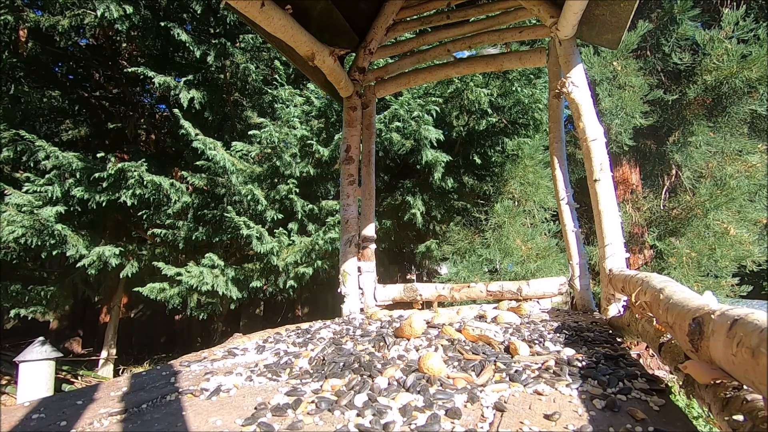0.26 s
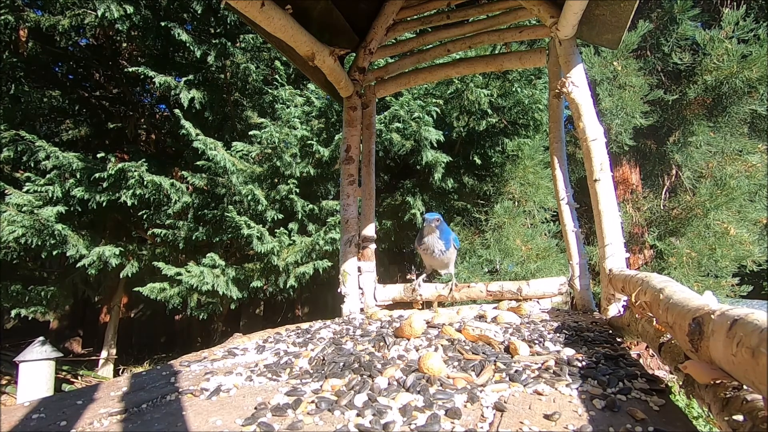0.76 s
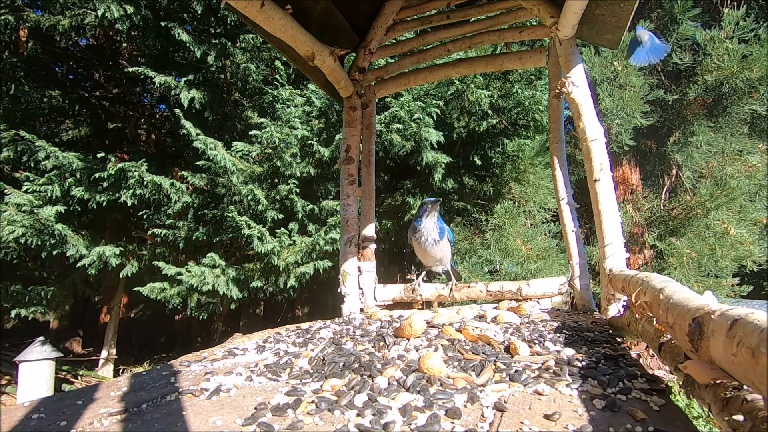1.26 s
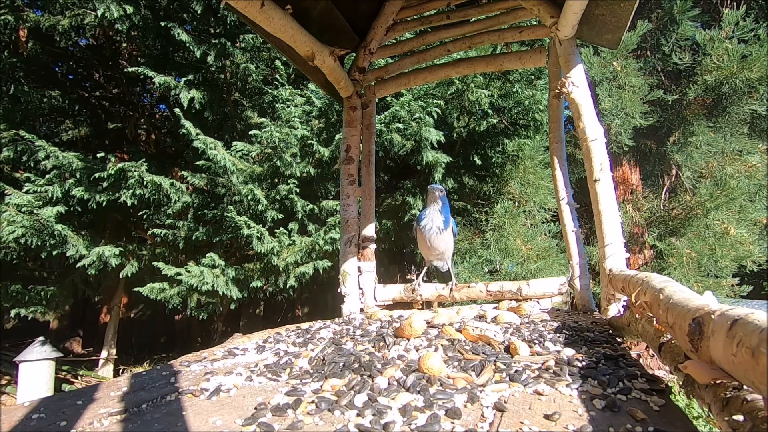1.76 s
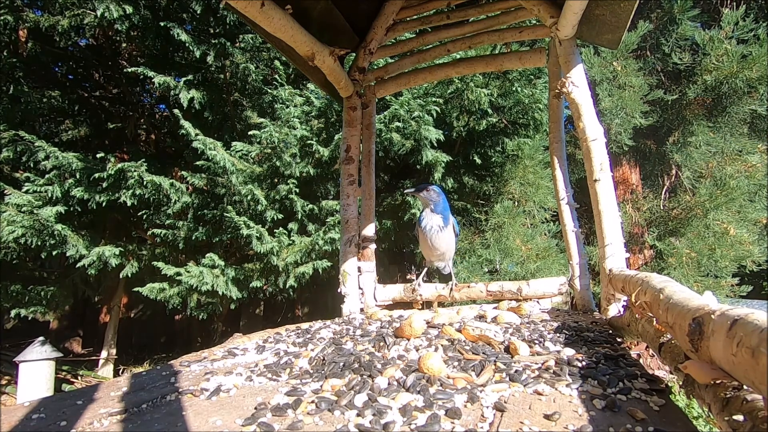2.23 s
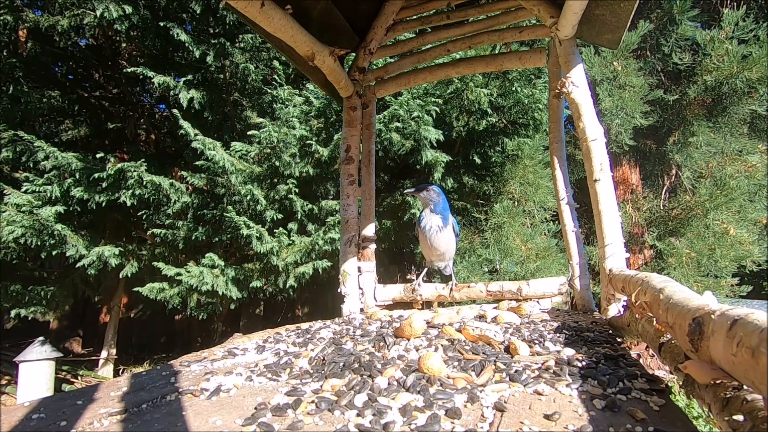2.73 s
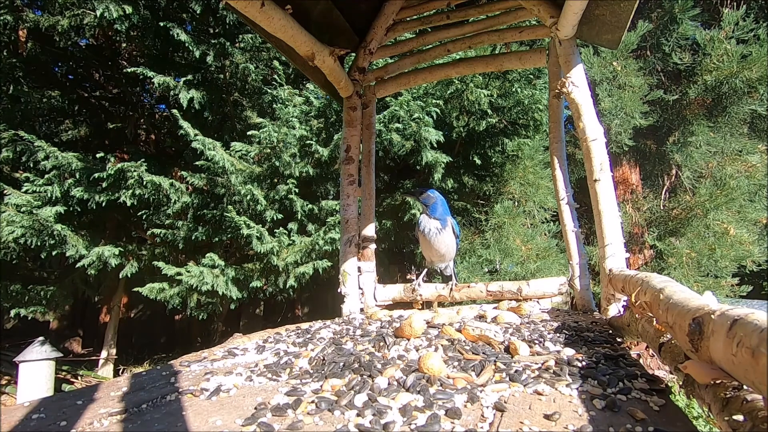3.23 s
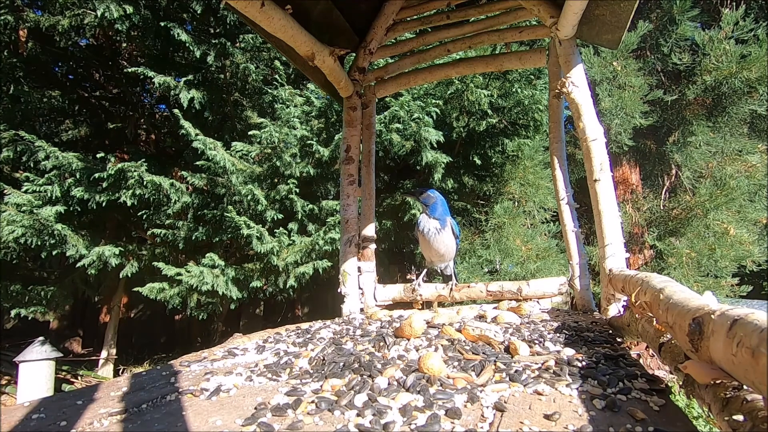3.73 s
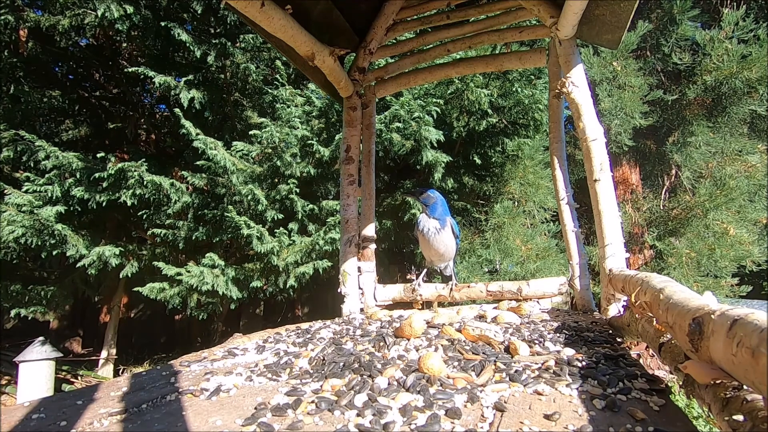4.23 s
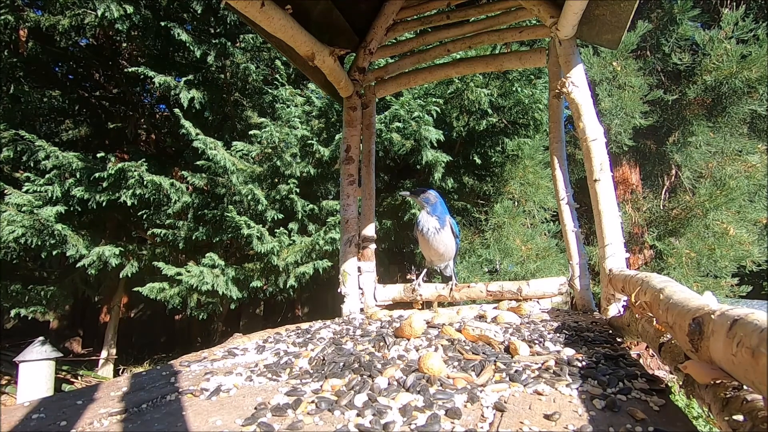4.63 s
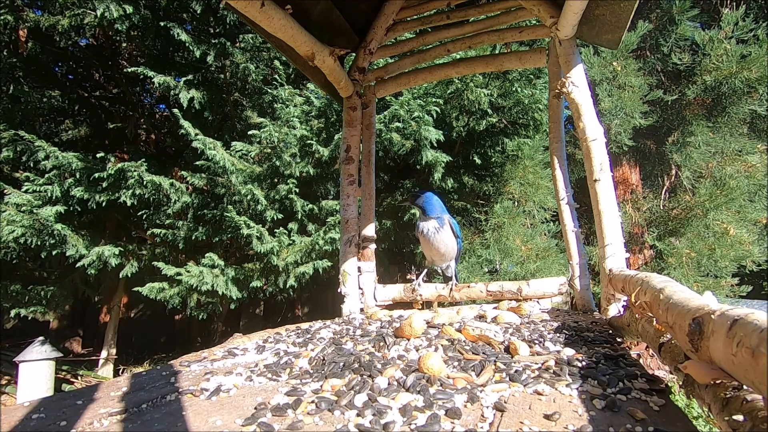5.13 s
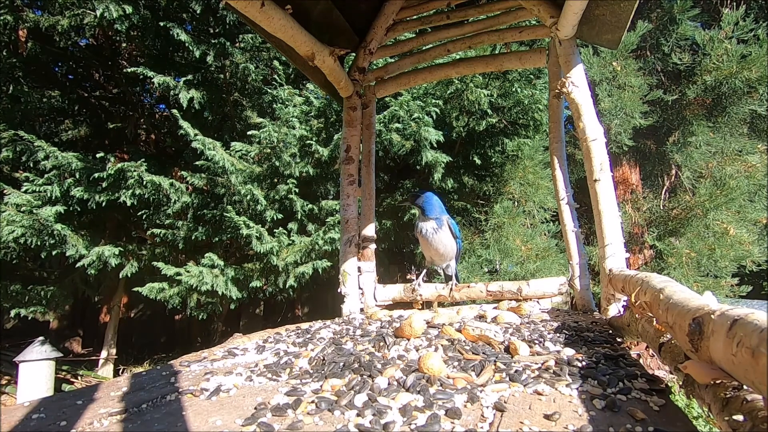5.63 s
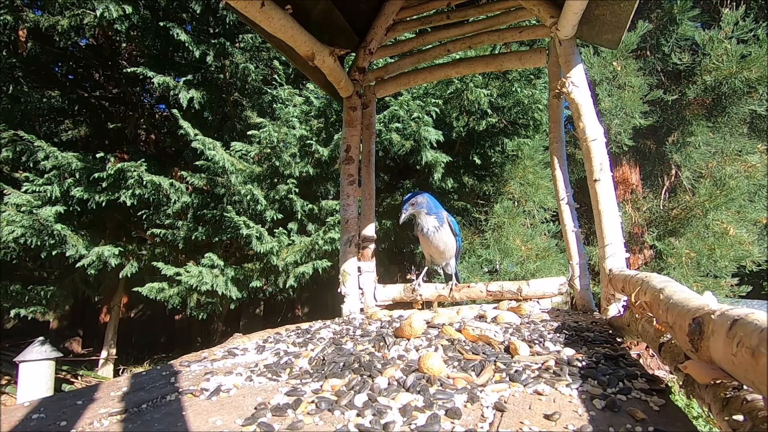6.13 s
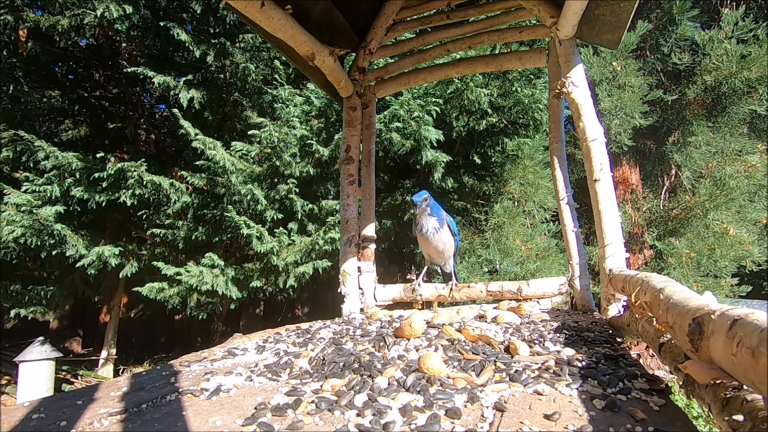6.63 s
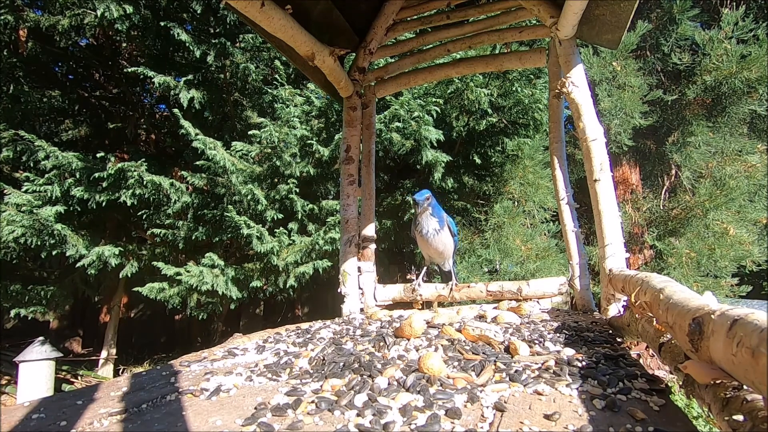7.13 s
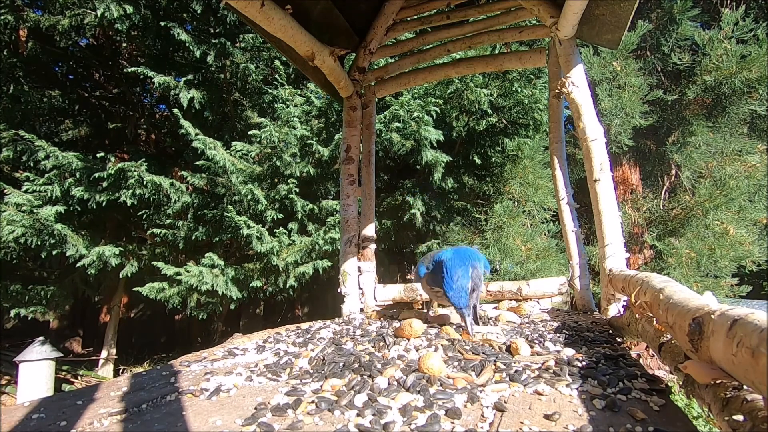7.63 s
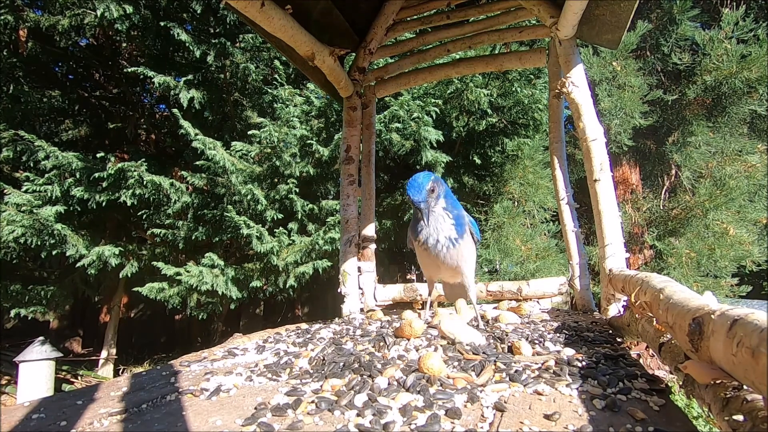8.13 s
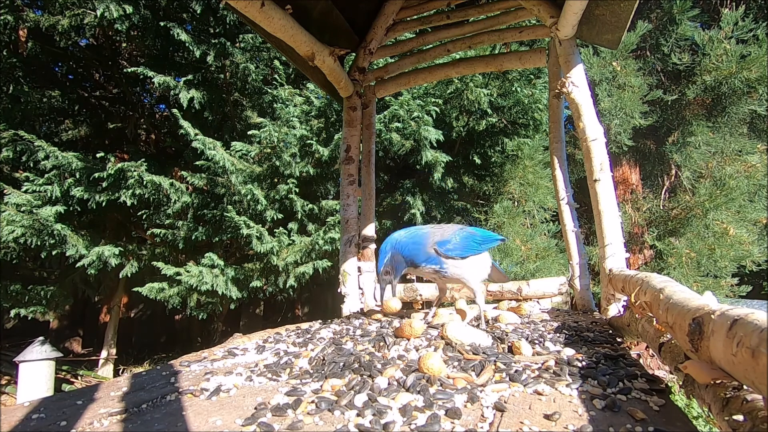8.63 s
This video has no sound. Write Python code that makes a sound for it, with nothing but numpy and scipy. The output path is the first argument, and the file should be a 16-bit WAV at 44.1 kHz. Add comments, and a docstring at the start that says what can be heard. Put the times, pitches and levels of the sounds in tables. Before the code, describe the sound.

Outdoors at a wooden bird feeder, microphone close on the seed tray. Faint wing flutter, a hollow thump of feet on the rail, then loud rasping jay shrieks overlapped by a second jay's short rising barks. After that it quiets to three soft rattling croaks and faint far jay calls over low traffic and a wavering machine hum. Finally claws scratch dry seed and a nut drops with a sharp click.

```python
"""A jay lands on a wooden feeder rail, two jays shriek and bark close by, then come three soft croaks,
scratching in the seed and a dropped nut; other jays answer far off over traffic and machine hum.
Calls: two coupled pitches and breath noise through throat and mouth; croaks: pulses and air ringing resonances.
Rail and nut shells: struck decaying modes; seed: random ticks; wings, traffic: shaped noise; hum: wavering sines.
Roof and yard add scattered echoes; the level ducks at the loudest sounds and recovers slowly."""
import sys
import numpy as np
from scipy import signal
from scipy.fft import rfft, irfft, next_fast_len
from scipy.io import wavfile
from scipy.ndimage import uniform_filter1d

SR = 44100
rng = np.random.default_rng(int(sys.argv[2]) if len(sys.argv) > 2 else 0)


def wrap_up_sound(samples):
    """Save the sound to the file named by the first command line argument, as 16-bit audio."""
    columns = np.atleast_2d(samples).T
    # keep every value between -1 and 1, then stretch to whole-number steps
    tamed = np.clip(columns, -1, 1)
    steps = np.round(tamed * 32767).astype(np.int16)
    wavfile.write(sys.argv[1], SR, steps)


N = 391608


def from_db(db):
    """Decibels to gain."""
    return 10 ** (np.asarray(db) / 20)


def rms_one(x):
    """Scale to rms 1."""
    return x / np.sqrt(np.mean(x ** 2) + 1e-20)


def at_hz(points, hz):
    """Read a spectrum on a log-frequency axis."""
    point_hz, value = np.array(points)[:, 0], np.array(points)[:, 1]
    return np.interp(np.log(hz), np.log(point_hz), value)


def colour(x, spectrum):
    """Weight every frequency by a spectrum in dB."""
    size = next_fast_len(x.shape[-1] + 512)
    hz = np.maximum(np.fft.rfftfreq(size, 1 / SR), 1)
    return irfft(rfft(x, size) * from_db(at_hz(spectrum, hz)), size)[..., :x.shape[-1]]


def drift(rate_hz, size):
    """Random wander of rms 1: noise through two equal one-pole low-passes."""
    r = np.exp(-2 * np.pi * rate_hz / SR)
    noise = rng.standard_normal(size + 1500)
    return rms_one(signal.lfilter([1], [1, -2 * r, r * r], noise)[1500:])      # skip the onset


def ring(drive, hz, t60_s):
    """Two-pole resonance: a unit click starts a decaying sine of height 1."""
    r, w = from_db(-60 / (t60_s * SR)), 2 * np.pi * hz / SR
    return signal.lfilter([0, np.sin(w)], [1, -2 * r * np.cos(w), r * r], drive + 1e-18)


def pan(x, db):
    """Mono to a pair, db = left over right."""
    return np.array([x * from_db(db / 2), x * from_db(-db / 2)])


def swells(rows, attack=1):
    """Sum of bell-shaped gains; attack scales the spread before each centre."""
    t = np.arange(N) / SR
    gain = 0
    for centre_s, spread_s, db in rows:
        side_s = spread_s * np.where(t < centre_s, attack, 1)
        gain = gain + from_db(db) * np.exp(-((t - centre_s) / side_s) ** 2)
    return gain


def arch(share, peak, rise_db, rise_power, fall_db, fall_power):
    """Level in dB that climbs to 0 at the peak and falls away."""
    before = np.clip(1 - share / peak, 0, 1)
    after = np.clip((share - peak) / (1 - peak), 0, 1)
    return -rise_db * before ** rise_power - fall_db * after ** fall_power


def echoes(x, t60_s, gap_s):
    """Dense decaying noise echoes after a gap, independent per channel."""
    t = np.arange(round(t60_s * SR)) / SR
    tail = rng.standard_normal((2, len(t))) * from_db(-60 * t / t60_s) * (t > gap_s)
    tail /= np.sqrt(np.sum(tail ** 2, axis=1, keepdims=True))
    return signal.fftconvolve(x, tail, axes=1)[:, :N]


def roof(x):
    """Posts and roof a few hand-widths away scatter mostly treble, differently on each use."""
    roof_db, t60_s = -7, 0.008
    scattered = echoes(x, t60_s, 0.0002)[:, :x.shape[1]]
    return x + from_db(roof_db) * colour(scattered, [(500, 3.5), (3000, -0.5), (8000, 10)])


def traffic():
    """Far traffic: shaped noise whose channels part towards the treble."""
    # Spectrum: f/Hz, relative level/(dB per Hz)
    traffic_spectrum = [(13, -32.5), (25, -13), (55, -2.5), (100, -5.5), (160, -11.5), (250, -7),
                        (340, -10), (460, -18.5), (975, -14), (1500, -24), (2170, -38), (4000, -51.5),
                        (8950, -53.5), (13000, -81)]
    # Left-right correlation: f/Hz, likeness/1
    likeness = [(25, 1), (110, 0.95), (380, 0.95), (700, 1), (1300, 0.22), (2400, 0.092), (10000, 0.11)]
    level_db = -44.5
    size = next_fast_len(N)
    hz = np.maximum(np.fft.rfftfreq(size, 1 / SR), 1)
    alike = np.clip(at_hz(likeness, hz), 0, 1)
    mid, side = rfft(rng.standard_normal((2, size))) * from_db(at_hz(traffic_spectrum, hz))
    pair = np.sqrt(1 + alike) * mid + np.sqrt(1 - alike) * side * [[1], [-1]]
    noise = irfft(pair, size)[:, :N]
    return from_db(level_db + drift(1.5, N)) * rms_one(noise)


def hum():
    """Machine hum: sines wavering in pitch and level, the highest also swelling and sinking."""
    # Steady lines: f/Hz, waver/dB, level/dB
    steady_lines = [(120.4, 2.5, -48), (236.7, -1, -55)]
    # Swell of the higher line: t/s, level/dB
    drone_swell = [(0.0, -48), (0.84, -50.5), (0.96, -48.5), (2.25, -46.5), (6.23, -58), (6.35, -49),
                   (7.52, -56.5), (8.88, -53)]
    drone_hz, drone_waver_db = 315.7, 1
    drone_db = np.interp(np.arange(N) / SR, *np.transpose(drone_swell))
    out = np.zeros(N)
    for line_hz, waver_db, db in steady_lines + [(drone_hz, drone_waver_db, drone_db)]:
        gain = from_db(db + waver_db * drift(2.1, N)) * np.sqrt(2)
        hz = line_hz * (1 + 0.00782 * drift(4, N))
        out += gain * np.sin(2 * np.pi * np.cumsum(hz) / SR)
    return out


def background():
    """Traffic and hum, slightly right of centre."""
    return (traffic() + hum()) * from_db([[-0.35], [0.35]])


def wings():
    """Feather hiss and rustles as shaped noise, wing wind as 20-45 Hz noise."""
    # Wing beats and faint bright rustles: t/s, spread/s, level/dB
    rustles = [(.22, 0.017, -57), (.47, 0.026, -61.5), (.6, 0.083, -55.5), (.8, 0.068, -62),
               (3.17, 0.039, -65), (3.52, 0.026, -66), (4.54, 0.026, -57.5), (7.79, .08, -58.5)]
    # Hiss spectrum: f/Hz, relative level/(dB per Hz)
    wing_air = [(1500, 7), (2500, 2.5), (5000, -1.5), (9000, 1), (11000, -17)]
    # Low wing-wind gusts: t/s, spread/s, level/dB
    gusts = [(.72, 0.054, -39.5), (.985, 0.033, -25.5)]
    hiss = rms_one(colour(rng.standard_normal((2, N)), wing_air))
    noise = rng.standard_normal(N) + 0.4 * rng.standard_normal((2, N))      # partly shared by both channels
    wind = signal.sosfilt(signal.butter(2, [20, 45], "band", fs=SR, output="sos"), noise)
    return swells(rustles) * hiss + swells(gusts) * rms_one(wind) * from_db([[-1.5], [1.5]])


def struck(blows, modes, spread_db):
    """Blows excite decaying modes, each with its own random strength."""
    s, blow_db, pan_db = np.transpose(blows)
    at = np.round(s * SR).astype(int)
    chance = rng.standard_normal((len(at), len(modes)))
    out = 0
    for k, (hz, db, t60_s) in enumerate(modes):
        clicks = np.zeros((2, N))
        clicks[:, at] = pan(from_db(blow_db + db + spread_db * chance[:, k]), pan_db)
        out = out + ring(clicks, hz, t60_s) * (-1) ** k
    # the contact is not perfectly hard
    return signal.sosfilt(signal.butter(1, 10000, fs=SR, output="sos"), out)


def landing():
    """Feet strike the low modes of the wooden rail."""
    # Footfalls: t/s, blow level/dB, left-right/dB
    footfalls = [(.664, -19.5, -7), (.674, -16, -4.5), (.70, -29, -12.5)]
    # Rail modes: f/Hz, relative level/dB, t60/s
    rail_modes = [(149, -10.5, 0.25), (211, -7.5, 0.21), (246, -13.5, .25), (320, -9, 0.059),
                  (448, -13.5, .08), (655, -13.5, 0.031)]
    return struck(footfalls, rail_modes, spread_db=2.7)


def seed():
    """Scratching claws and shifting seed: dense uneven random ticks shaped by dry husks."""
    # Scratches and shifting seed: t/s, spread/s, level/dB
    scratches = [(.666, 0.007, -41.5), (7.61, 0.04, -37), (7.655, 0.012, -53), (7.686, 0.027, -43.5),
                 (7.821, 0.0084, -53), (8.07, 0.015, -61.5), (8.118, 0.033, -56.5), (8.183, 0.023, -49),
                 (8.238, 0.023, -60), (8.63, 0.034, -56)]
    # Husk spectrum: f/Hz, relative level/dB
    husks = [(1200, -8), (2200, 6.5), (3200, 3.5), (5000, -6.5), (7000, -7), (9500, -7.5), (12000, -23.5),
             (15500, -25)]
    attack = 0.46      # rise time over decay time
    ticks_per_s = 700
    size = (3, N)
    present = rng.random(size) < ticks_per_s / SR
    height = from_db(2.1 * np.minimum(rng.exponential(1, size), 4))
    ticks = present * height * rng.choice([-1, 1], size)
    mid, left, right = rms_one(colour(ticks, husks))
    return swells(scratches, attack) * (mid + 0.71 * np.array([left, right]))


def partials(phase, pitch_hz, count, level_db, hoarse):
    """Harmonics that fade upwards in soft passages and break up singly with hoarseness."""
    odd_db, breakup_db = -5, 8      # odd partials are weaker; breakup when fully hoarse
    out = 0
    for k in range(1, count):
        breakup = breakup_db * np.sqrt(hoarse) * drift(38, len(phase))
        gain = from_db(0.21 * k * level_db + odd_db * (k % 2) + breakup)
        out = out + np.cos(k * phase + k * k) * (k * pitch_hz < 15000) * gain
    return out


def voice(hoarse, level_db, mouth_hz, first_hz, second_hz, joined, throat):
    """Two unsteady coupled syrinx sides plus breath, through throat and moving mouth; level evened."""
    second_db, coupling_db = -2, 1      # second side alone; sum and difference tones
    flutter_db = 3      # whole voice, when fully hoarse
    size, hoarse = len(hoarse), np.clip(hoarse, 0, 1)

    def unsteady_phase(hz):
        return 2 * np.pi * np.cumsum(hz * (1 + 0.07 * hoarse * drift(70, size))) / SR

    first, second = unsteady_phase(first_hz), unsteady_phase(second_hz)
    pulses = partials(first, first_hz, 29, level_db, hoarse)
    pulses = pulses * (1 + joined * from_db(coupling_db) * np.cos(second))
    pulses = pulses + joined * from_db(second_db) * partials(second, second_hz, 5, level_db, hoarse)
    pulses = pulses * from_db(flutter_db * hoarse * drift(250, size))
    breath = hoarse * rng.standard_normal(size)
    sound = colour(np.sqrt(1 - hoarse ** 2) * rms_one(pulses) + breath, throat)

    # moving mouth resonance
    hz, s, frames = signal.stft(sound, SR, nperseg=256)
    centre_hz = np.interp(s, np.arange(size) / SR, mouth_hz)
    mouth_db = 7.1 * np.exp(-((hz[:, None] - centre_hz) / 600) ** 2)
    sound = signal.istft(frames * from_db(mouth_db), SR)[1][:size]

    evened = sound / np.sqrt(uniform_filter1d(sound ** 2, size=500) + 1e-20)
    return from_db(level_db) * signal.windows.tukey(size, 0.08) * evened


def calls(rows, song, loudness, throat):
    """Calls of one song and loudness arch: [direct sound with roof, sound sent to the yard]."""
    nearness = 0.71      # share of extra level due to closeness, so not reaching the yard
    out = np.zeros((2, 2, N))
    faintest_db = min(row[2] for row in rows)
    for s, length_s, level_db, pan_db, hoarser in rows:
        at, size = round(s * SR), round(length_s * SR)
        share = np.linspace(0, 1, size)
        hoarse, *controls = song(share)
        sound = voice(hoarse + hoarser, arch(share, *loudness), *controls, throat)
        call = pan(from_db(level_db) * sound, pan_db)
        sent = call * from_db(nearness * (faintest_db - level_db))
        out[:, :, at:at + size] += [roof(call), sent]
    return out


def shriek_song(share):
    """Hoarseness, mouth/Hz, both pitches/Hz and second-side entry along a shriek."""
    # First syrinx side: share of length/1, f/Hz
    first_pitch = [(0, 560), (.11, 1130), (.235, 1510), (.36, 1375), (.47, 1390), (.56, 1050), (.65, 800),
                   (.76, 530), (1, 390)]
    # Second side, entering at its first point: share of length/1, f/Hz
    second_pitch = [(.27, 2000), (.36, 1860), (.45, 2050), (.7, 2250), (.86, 2250), (1, 1750)]
    start_hoarse, gained_hoarse = 0.22, 0.45
    mouth_start_hz, mouth_opens_hz, mouth_climbs_hz = 1785, 1308, 1497
    entry_at, entry_share = second_pitch[0][0], 0.04
    hoarse = start_hoarse + gained_hoarse * share ** 2
    mouth_hz = mouth_start_hz + mouth_opens_hz * np.minimum(share / entry_at, 1) + mouth_climbs_hz * share ** 2
    first_hz = np.interp(share, *np.transpose(first_pitch))
    second_hz = np.interp(share, *np.transpose(second_pitch))
    joined = np.clip((share - entry_at) / entry_share, 0, 1)
    return hoarse, mouth_hz, first_hz, second_hz, joined


def shrieks():
    """Long close shrieks: the first pitch swoops up, then sinks after the second side joins."""
    # Shrieks: t/s, length/s, level/dB, left-right/dB, added hoarseness/1
    shriek_rows = [(.886, 0.15, -14.5, -6, 0.07), (1.108, .16, -23, -3.5, 0), (1.335, 0.19, -30, 0, .22),
                   (1.572, .18, -30, -0.5, .22), (2.207, .168, -28.5, -1.5, .15),
                   (2.563, .18, -30.5, -1.5, 0.17)]
    # Throat: f/Hz, relative level/(dB per Hz)
    throat = [(700, -37.5), (1350, -16.5), (1940, -1.5), (2470, -7.5), (3470, -3), (4920, -7.5),
              (5700, -2.5), (7960, -10), (9790, -19), (10800, -40), (15000, -43.5)]
    # Arch: peak at share of length/1, rise/dB, rise power/1, fall/dB, fall power/1
    loudness = (0.36, 25, 3.5, 12, 3)
    return calls(shriek_rows, shriek_song, loudness, throat)


def bark_song(share):
    """A clear rising chirp turns hoarse as the second side joins; outputs as for a shriek."""
    chirp_from_hz, chirp_to_hz, chirp_end, entry_share = 1150, 1630, 0.19, 0.04
    body_rise_hz, second_hz, second_rise_hz, second_db = 150.7, 2214, 263, 5.5
    body_hoarse, gained_hoarse = 0.3, 0.4
    body_mouth_hz, mouth_rise_hz = 2240, 1280
    joined = np.clip((share - chirp_end) / entry_share, 0, 1)
    body = np.clip((share - chirp_end) / (1 - chirp_end), 0, 1)
    chirp = np.sin(np.pi / 2 * np.minimum(share / chirp_end, 1))
    first_hz = chirp_from_hz + (chirp_to_hz - chirp_from_hz) * chirp + body_rise_hz * body
    # the mouth follows the second partial until the second side joins
    open_mouth_hz = body_mouth_hz + mouth_rise_hz * np.minimum(2 * body, 1)
    mouth_hz = 2 * first_hz + joined * (open_mouth_hz - 2 * first_hz)
    hoarse = joined * (body_hoarse + gained_hoarse * body)
    return hoarse, mouth_hz, first_hz, second_hz + second_rise_hz * body, joined * from_db(second_db)


def barks():
    """Short rising barks of a second close jay."""
    # Barks: t/s, length/s, level/dB, left-right/dB, added hoarseness/1
    bark_rows = [(1.315, 0.076, -24, -4.5, 0.36), (1.45, 0.052, -26.5, 1.5, 0.14),
                 (1.565, 0.061, -24.5, 0, 0.23), (1.705, 0.068, -23, -1, 0.1),
                 (1.824, 0.084, -21.5, -1.5, 0.1), (2.005, .088, -25, 4, 0.13)]
    # Throat: f/Hz, relative level/(dB per Hz)
    throat = [(760, -52), (1300, -21), (2260, -5), (2980, -10.5), (3370, -5), (4010, -7.5), (5120, -20.5),
              (7950, -15.5), (15000, -68.5)]
    # Arch: peak at share of length/1, rise/dB, rise power/1, fall/dB, fall power/1
    loudness = (0.54, 14.3, 0.86, 13.3, 2.26)
    return calls(bark_rows, bark_song, loudness, throat)


def croaks():
    """Uneven pulses and rough air ring the low throat resonances, escaping air the upper ones."""
    # Soft croaks: t/s, length/s, level/dB
    croak_rows = [(3.888, 0.094, -31), (4.383, 0.088, -31.5), (5.897, .092, -31)]
    # Throat resonances: f/Hz, width/Hz, relative level/dB
    resonances = [(860, 51, -9.5), (1230, 117, 6.5), (2250, 180, 0.5), (2690, 140, -14.5),
                  (3750, 4200, -1.5), (6300, 1400, -3.5), ]
    # Arch: peak at share of length/1, rise/dB, rise power/1, fall/dB, fall power/1
    loudness = (0.67, 26.6, 1.33, 19, 3.2)
    from_per_s, to_per_s = 85, 120      # pulses quicken
    deepens_db = 25      # swell through a croak per octave under 1.7 kHz
    lead_db, sag = 15, 0.103      # upper resonances start weaker; final sink of all, as a share
    out = np.zeros(N)
    for s, length_s, level_db in croak_rows:
        at, size = round(s * SR), round(length_s * SR)
        share = np.linspace(0, 1, size)
        per_s = from_per_s + (to_per_s - from_per_s) * share
        cycles = np.cumsum(per_s * from_db(2.2 * drift(60, size))) / SR
        pulses = np.diff(np.floor(cycles), prepend=0) * from_db(3 * rng.standard_normal(size))
        pulses = uniform_filter1d(pulses, size=7) * 7      # the membranes part softly
        air = 0.45 * rng.standard_normal(size) * (1.5 - cycles % 1)      # strongest just after each pulse
        sound = 0
        for hz, width_hz, db in resonances:
            drive = pulses + 0.9 * air if hz < 3200 else 1.63 * air
            swell_db = deepens_db * (share - 1.5) * max(np.log2(1700 / hz), 0)
            late_db = lead_db * (hz > 2400) * np.clip(1 - share / 0.24, 0, 1)
            sound = sound + from_db(db + swell_db - late_db) * ring(drive, hz, 2.06 / width_hz)
        # the throat lengthens at the end: slower reading lowers all resonances
        sound = np.interp(np.cumsum(1 - sag * share ** 4), np.arange(size), sound)
        out[at:at + size] += from_db(level_db + arch(share, *loudness)) * rms_one(sound)
    return signal.sosfilt(signal.butter(4, [650, 8800], "band", fs=SR, output="sos"), out)


def far_jays():
    """Far answers: hoarser barks through a throat spectrum of their own."""
    # Far calls: t/s, level/dB, left-right/dB
    far_rows = [(4.102, -53.5, -1.5), (4.935, -59, -1), (5.263, -59, -3), (5.732, -62.5, -1),
                (6.336, -51, -3.5), (7.199, -59, -1.5)]
    # Throat: f/Hz, relative level/(dB per Hz)
    throat = [(1180, -25), (2000, -2.5), (2700, -6.5), (3300, -17), (3970, -12), (6220, -13),
              (11000, -42.5), (14300, -79)]
    # Arch: peak at share of length/1, rise/dB, rise power/1, fall/dB, fall power/1
    loudness = (0.4, 16, 2.1, 29, 1.95)
    length_s, hoarser = 0.08, 0.56
    rows = [(s, length_s, db, pan_db, hoarser) for s, db, pan_db in far_rows]
    return calls(rows, bark_song, loudness, throat)


def nut_taps():
    """Claws, bill and the dropped nut: blows on short-ringing shell modes."""
    # Taps: t/s, blow level/dB, left-right/dB
    tap_rows = [(7.5837, -40, -5), (7.6103, -34.5, -12), (7.6884, -32.5, -12), (7.819, -47, 3),
                (8.1665, -15, -3.5), (8.1728, -28.5, 4), (8.6208, -46, 3)]
    # Shell modes: f/Hz, relative level/dB, t60/s
    shell_modes = [(1230, -4, .008), (1600, -3.5, .012), (2120, -11, .016), (2780, -4, .012),
                   (3250, 0, .011), (4000, -8, .012), (4850, -6, .007), (6640, -14, .01), (7450, -15, .008),
                   (9500, -24, .006)]
    return struck(tap_rows, shell_modes, spread_db=2.5)


def yard(jays_sent, far_sent, near):
    """Late scattered echoes from the trees, half a second long."""
    sent = from_db(-9.5) * jays_sent + from_db(-3.5) * far_sent + from_db(-29) * near
    trees = echoes(sent, t60_s=0.5, gap_s=0.013)
    return colour(trees, [(1000, 4.5), (4000, 3), (10000, 7.4)])


def scene():
    """Jays in the yard, small sounds under the feeder roof, wings and background."""
    jays, jays_sent = shrieks() + barks()
    far, far_sent = far_jays()
    near = landing() + seed() + pan(croaks(), -1.3) + nut_taps()
    return background() + wings() + roof(near) + jays + far + yard(jays_sent, far_sent, near)


def record(dry):
    """Gain control ducks fast and recovers slowly, then a steep treble cut-off."""
    threshold_db, duck_ratio, recovery_db_per_s = -19.5, 0.95, 2.97
    cutoff_hz = 15650      # 60 dB down from here
    level_db = 10 * np.log10(uniform_filter1d(np.mean(dry ** 2, axis=0), size=1500) + 1e-12)
    duck_db = duck_ratio * np.maximum(level_db - threshold_db, 0)
    recovered_db = recovery_db_per_s * np.arange(N) / SR
    duck_db = np.maximum.accumulate(duck_db + recovered_db) - recovered_db
    wet = dry * from_db(-uniform_filter1d(duck_db, size=800))
    return signal.sosfilt(signal.cheby2(12, 60, cutoff_hz, fs=SR, output="sos"), wet)


dry = scene()
out = record(dry)
wrap_up_sound(out)
```